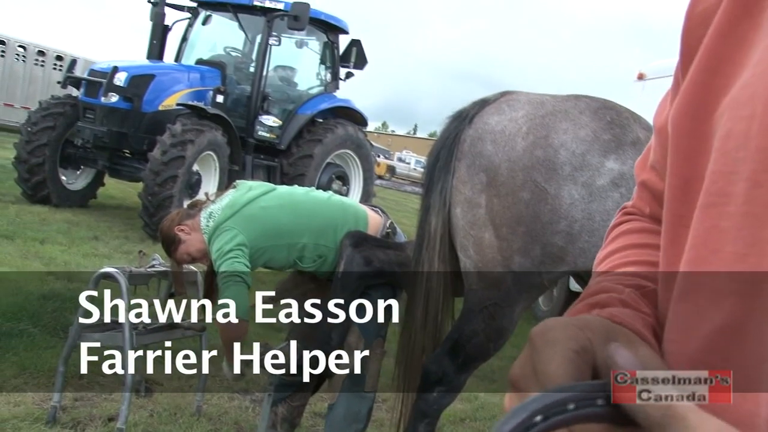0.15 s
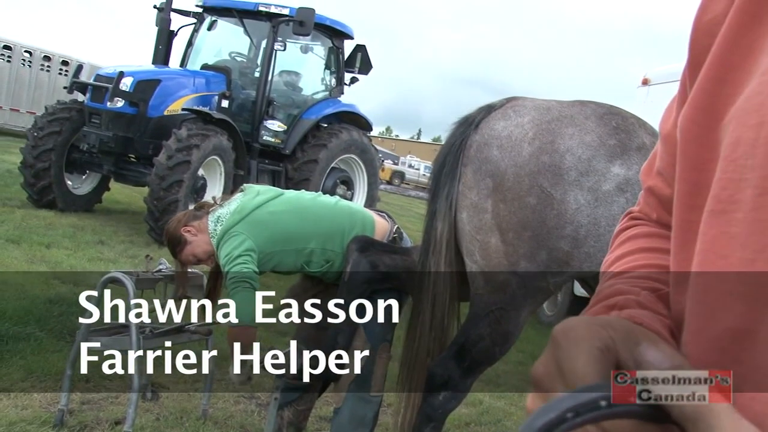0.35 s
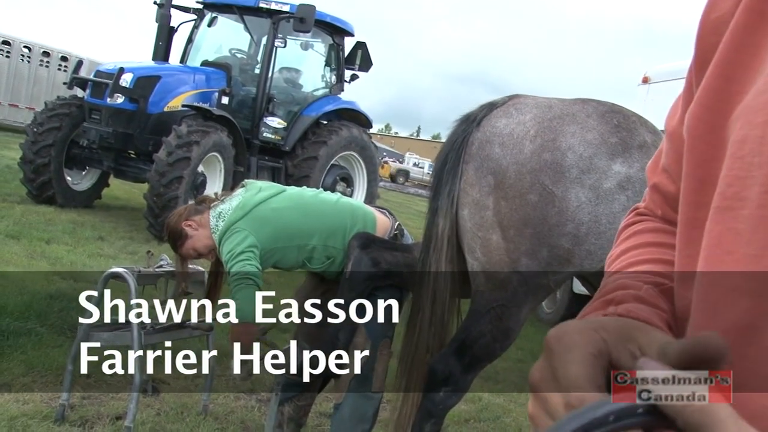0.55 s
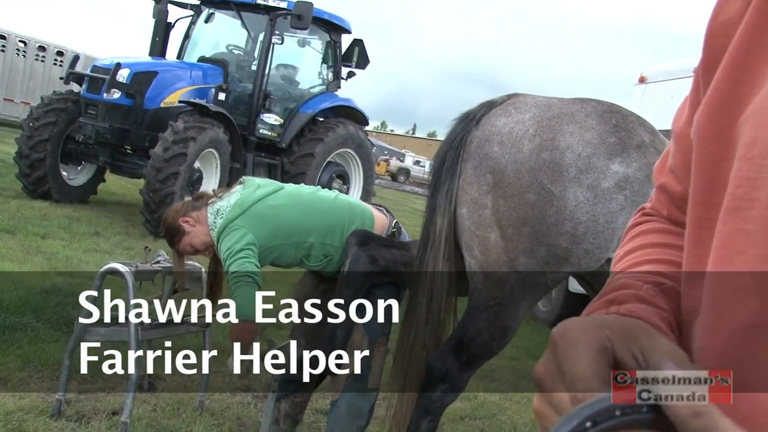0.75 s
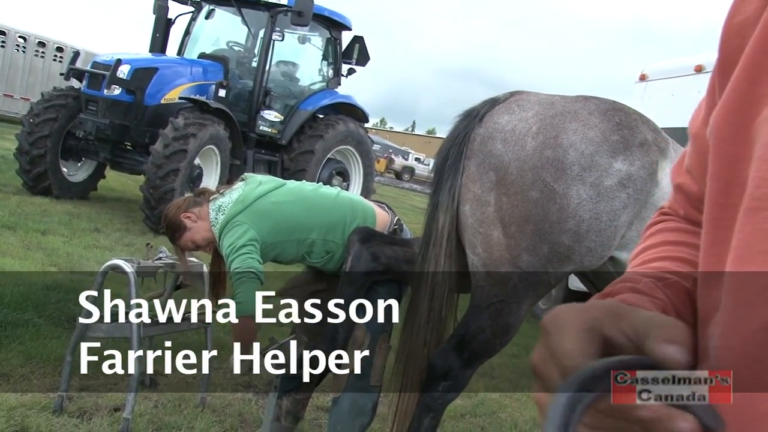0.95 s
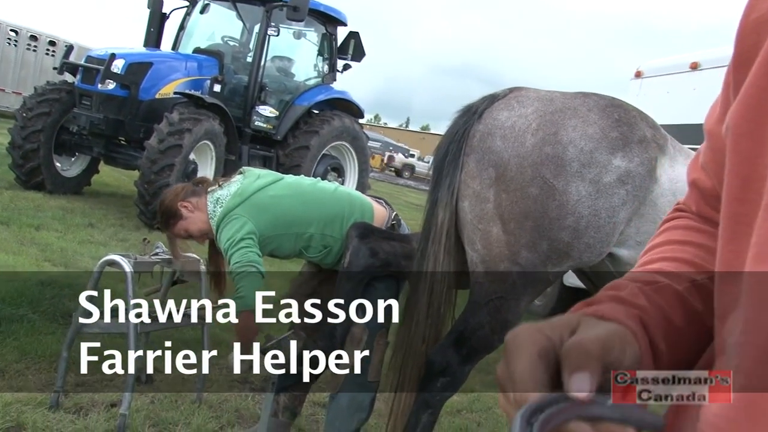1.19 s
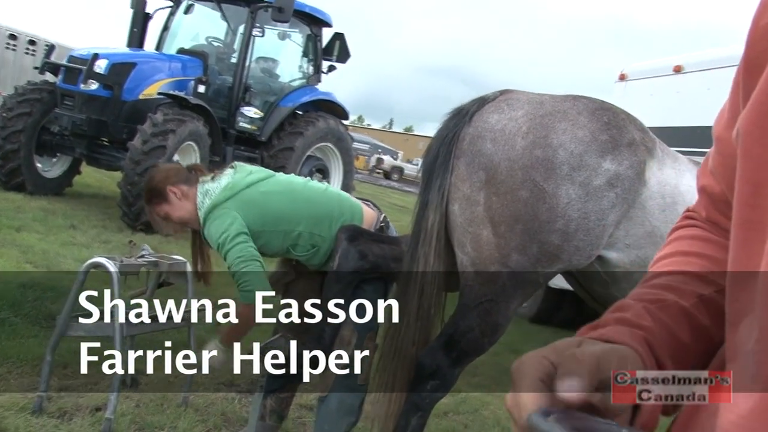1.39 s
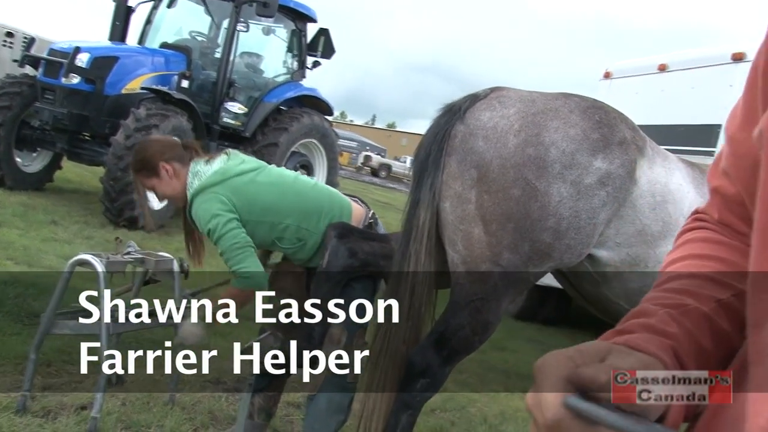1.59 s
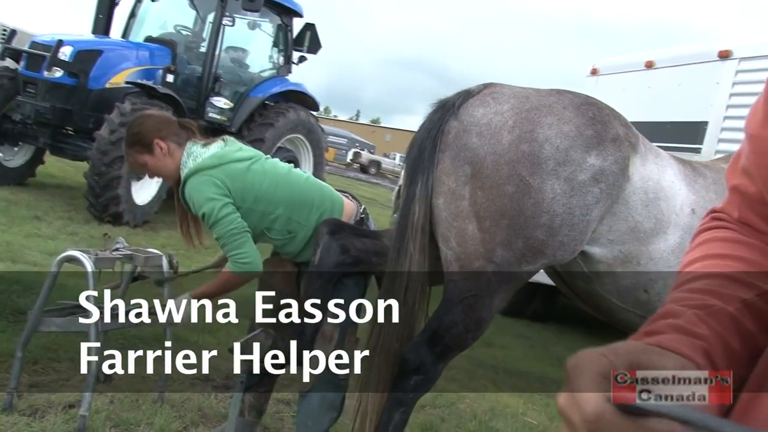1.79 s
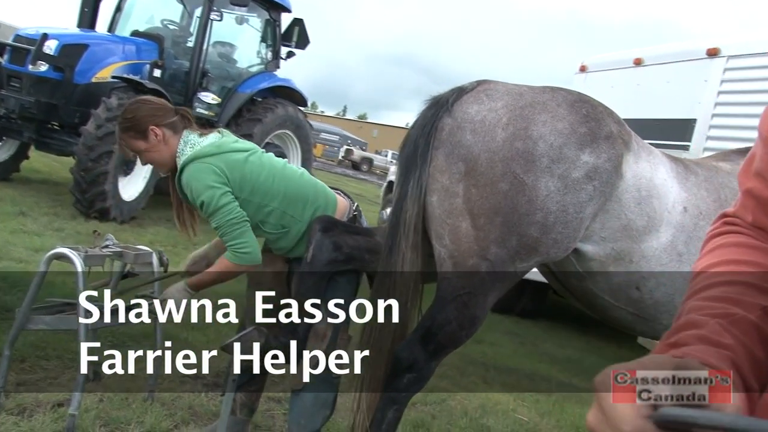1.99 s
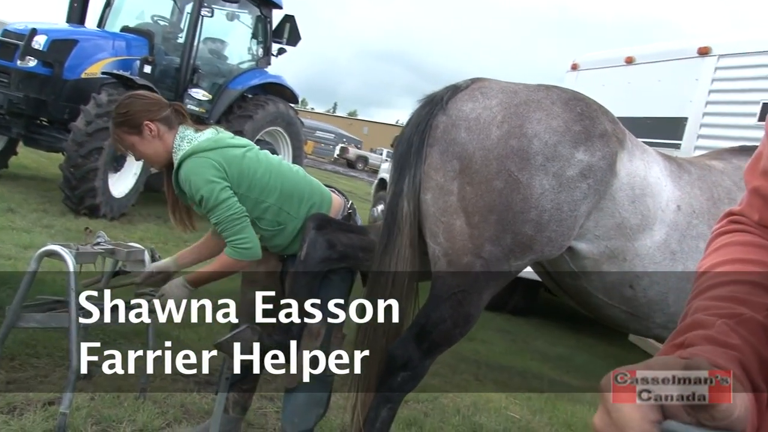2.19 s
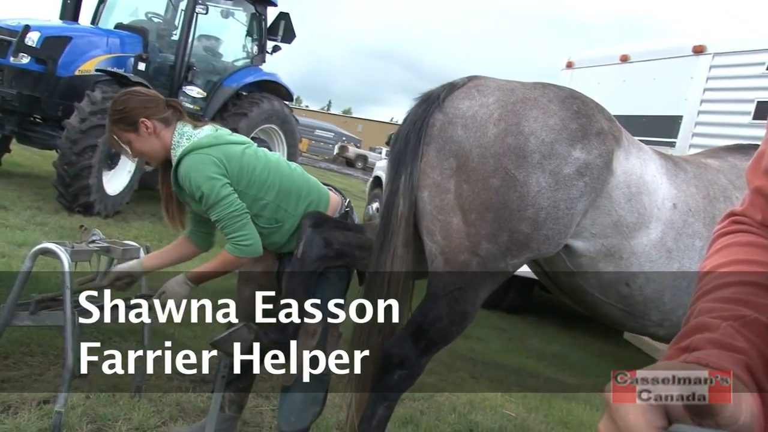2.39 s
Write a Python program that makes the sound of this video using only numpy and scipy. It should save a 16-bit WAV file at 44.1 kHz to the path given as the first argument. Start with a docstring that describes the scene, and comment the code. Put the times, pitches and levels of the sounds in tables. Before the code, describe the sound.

Steel horseshoe struck six times by a hammer outdoors, abruptly cutting to a tool's soft clatter

```python
"""Hammer on a horseshoe, then a dropped tool

Six hammer blows ring a steel horseshoe close by, outdoors: noise cracks and damped modes, echoed by a building.
Gain control ducks each blow too late to prevent clipping. A distant engine hums as two harmonics under faint whines
and a noise rumble. An abrupt cut leads to a quieter stretch, where a steel tool clinks as damped modes, then drops
and clatters to rest in knocks of noise and modes with a diffuse tail."""
import sys
import numpy as np
from scipy import signal
from scipy.fft import rfft, irfft
from scipy.io import wavfile
from scipy.ndimage import map_coordinates

SR = 44100
rng = np.random.default_rng(int(sys.argv[2]) if len(sys.argv) > 2 else 0)


def transcribe(u):
    """Save the signal u as a 16-bit wav file named by the first command-line argument.

    u: samples, shape (n,) or (channels, n), limited to [-1, 1]; the rate is SR.
    q: integer samples, one column per channel.
    """
    v = np.clip(np.atleast_2d(u).T, -1, 1)
    q = np.round(v * 32767).astype(np.int16)
    wavfile.write(sys.argv[1], SR, q)


N = 108045
CUT_S, CUT_FADE_S = 1.568, 0.0052


def amp(db):
    """Logarithmic level: decibels to linear gain."""
    return 10 ** (np.asarray(db) / 20)


def unit(x):
    """Power normalization: scales a signal to rms 1."""
    return x / np.sqrt(np.mean(x ** 2) + 1e-20)


def along(points, hz):
    """Logarithmic frequency scale: reads (Hz, value) points by interpolation in log frequency."""
    point_hz, values = np.transpose(points)
    return np.interp(np.log(hz + 1), np.log(point_hz + 1), values)


def curve(rows):
    """Linear interpolation in time: (s, value) points to one value per sample."""
    return np.interp(np.arange(N) / SR, *np.transpose(rows))


def wobble(rate):
    """Band-limited fluctuation: a smooth curve through random knots, rate of them per second."""
    knots = rng.standard_normal(int(N * rate / SR) + 4)
    return map_coordinates(knots, [np.arange(N) * rate / SR])


def pan(db):
    """Interaural level difference: gains whose left minus right is db."""
    return amp(np.array([[db], [-db]]) / 2)


def add(track, s, sound):
    """Superposition: mixes a sound into the track at time s."""
    start = round(s * SR)
    track[:, start:start + sound.shape[1]] += sound[:, :N - start]


def noise(spectrum, alike, size, tilt_db=0):
    """Spectral shaping: coloured stereo noise of rms 1; alike is the left-right correlation."""
    hz = np.fft.rfftfreq(size, 1 / SR)
    tilt = tilt_db * np.log2((hz + 1) / 1000)
    colour = amp(along(spectrum, hz) + tilt)
    mid, side = irfft(rfft(rng.standard_normal((2, size))) * colour, size)
    # The mid-side angle sets the correlation
    turn = np.arccos(np.clip(alike, -1, 1)) / 2
    return unit(np.cos(turn) * mid + np.sin(turn) * np.array([side, -side]))


def fall(t, t60):
    """Exponential damping: 60 dB lost in t60 seconds."""
    return np.exp(-np.log(1000) * t / t60)


def diffuse(sound, decays):
    """Reverberation: convolution with a fresh noise tail of energy 1 whose bands decay at their own rates."""
    hz, t, bands = signal.stft(rng.standard_normal((2, SR // 2)), SR, nperseg=128)
    band_t60 = along(decays, hz)[:, None]
    tail = signal.istft(bands * fall(t, band_t60), SR, nperseg=128)[1]
    return signal.fftconvolve(sound, tail / np.linalg.norm(tail[0]), axes=1)


def before_cut():
    """Gating: 1 until the abrupt cut, 0 after it, with a short linear fade."""
    return np.clip((CUT_S - np.arange(N) / SR) / CUT_FADE_S + .5, 0, 1)


# Firing rate of the engine: start_s [s], pitch_hz [Hz]
ENGINE_PITCH = [(0.0, 76.9), (0.27, 76.3), (0.45, 84.47), (0.74, 81.24), (1.28, 73.8), (1.55, 73.33),
                (1.66, 77.92), (2.2, 80.66), (2.45, 81.54)]
# Base level of the engine hum: start_s [s], level_db [dB]
HUM_LEVEL = [(0, -32.5), (.17, -32.5), (.3, -37), (.9, -36.5), (1.2, -31.5), (1.4, -26.5), (1.55, -35),
             (1.59, -41), (1.7, -52), (2.45, -53.5)]
SECOND_LOUD_DB, SECOND_QUIET_DB, HUM_WAVER_DB = -10, -2.5, 1.5  # second harmonic before and after the cut


def engine_hum():
    """Harmonic series: the firing rate and its second harmonic, each wavering in level."""
    phase = 2 * np.pi * np.cumsum(curve(ENGINE_PITCH)) / SR
    second_db = SECOND_QUIET_DB + (SECOND_LOUD_DB - SECOND_QUIET_DB) * before_cut()
    first = amp(HUM_WAVER_DB * wobble(14)) * np.sin(phase)
    second = amp(second_db + HUM_WAVER_DB * wobble(11)) * np.sin(2 * phase)
    return amp(curve(HUM_LEVEL)) * (first + second)


# Centre pitch of each faint tone: pitch_hz [Hz]
WHINE_PITCH = [284, 1510, 3020, 4530, 12080]
# Level of each tone: level_db before the cut [dB], level_db after it [dB]
WHINE_LEVELS = [(-43, -59.5), (-58.5, -76), (-68, -86.5), (-73.5, -87), (-73, -105)]
WHINE_DRIFT_HZ = 3


def faint_whines():
    """Frequency modulation: sinusoids that drift slightly in pitch and step down at the cut."""
    early = before_cut()
    out = np.zeros(N)
    for hz, (early_db, late_db) in zip(WHINE_PITCH, WHINE_LEVELS):
        level_db = late_db + (early_db - late_db) * early
        drifting_hz = hz + WHINE_DRIFT_HZ * wobble(6.6)
        out += amp(level_db) * np.sin(2 * np.pi * np.cumsum(drifting_hz) / SR)
    return out


# Relative spectrum of the outdoor rumble before the cut: pitch_hz [Hz], level_db [dB]
AIR_BEFORE = [(20, -16), (50, -13.5), (80, -0.5), (110, -11.5), (200, -16), (320, -18), (640, -31),
              (1500, -42), (3000, -48), (8000, -55.5), (15000, -63)]
# Relative spectrum of the outdoor rumble after the cut: pitch_hz [Hz], level_db [dB]
AIR_AFTER = [(20, -21), (50, -10.5), (75, -2), (120, -12.5), (190, -18), (350, -22.5), (600, -31.5),
             (1500, -40.5), (4000, -50), (9000, -56), (15000, -69)]
AIR_LOUD_DB, AIR_QUIET_DB = -33, -50
AIR_ALIKE = .5  # left-right correlation


def outdoor_rumble():
    """Broadband noise: two partly correlated stereo spectra that change over at the cut."""
    early = before_cut()
    loud = amp(AIR_LOUD_DB) * noise(AIR_BEFORE, AIR_ALIKE, size=N)
    quiet = amp(AIR_QUIET_DB) * noise(AIR_AFTER, AIR_ALIKE, size=N)
    return early * loud + (1 - early) * quiet


BACKGROUND_PAN_DB = -4.5  # left minus right


def background():
    """Superposition: hum, whines and rumble share one left-right level difference."""
    return pan(BACKGROUND_PAN_DB) * (engine_hum() + faint_whines() + outdoor_rumble())


# Relative spectrum of steel-contact noise: pitch_hz [Hz], level_db [dB]
CRACK_SPECTRUM = [(100, -9), (300, -9), (700, -21.5), (1080, -5.5), (1400, -10.5), (1920, 0.5),
                  (2400, -13.5), (2900, -9), (4100, -11.5), (5600, 8), (6800, -4.5), (9000, -5.5),
                  (12000, -11.5), (16000, -22.5)]
CRACK_T60_S, CRACK_ALIKE = 0.038, .4  # decay, left-right correlation


def crack_noise(t, tilt_db=0):
    """Impulsive excitation: a contact's coloured noise under exponential damping."""
    return noise(CRACK_SPECTRUM, CRACK_ALIKE, size=len(t), tilt_db=tilt_db) * fall(t, CRACK_T60_S)


MODE_SCATTER_DB = 1.5
PORT_SCATTER_RAD = .5  # random phase at each of the two microphone ports


def ring(modes, t):
    """Modal superposition: damped sinusoids in stereo, at fresh levels for each contact."""
    out = np.zeros((2, len(t)))
    for hz, db, t60 in modes:
        phase = 2 * np.pi * hz * t + PORT_SCATTER_RAD * rng.standard_normal((2, 1))
        level_db = db + MODE_SCATTER_DB * rng.standard_normal()
        out += amp(level_db) * np.sin(phase) * fall(t, t60)
    return out


# Upper modes of the struck steel: pitch_hz [Hz]
STEEL_PITCH = [6058, 6353, 9188, 10423, 12096]
# Ring of each mode: t60_s before the blow's ring factor [s], left minus right [dB], waver_db [dB]
STEEL_RING = [(.036, 0, 1), (.036, 2, 1), (.033, -6, 1), (.25, -5, 3), (.07, 0, 2)]
PORT_LAG_S = 2e-5  # the left port hears the steel first
WAVER_PER_S, WAVER_ONSET_S = 35, .14  # the ring wavers more as it fades
SWAY_RAD, SWAY_PER_S = .9, 25  # the steel moves, so its ring drifts in phase at each port


def steel_clang(t, modes_db, ring_factor):
    """Modal vibration: damped steel modes, drifting in phase and wavering in level as they fade."""
    out = np.zeros((2, len(t)))
    fading = np.minimum(t / WAVER_ONSET_S, 1)
    port_time = t + PORT_LAG_S * np.array([[1], [0]])
    for hz, (t60, pan_db, waver_db), db in zip(STEEL_PITCH, STEEL_RING, modes_db):
        phase = 2 * np.pi * hz * port_time + PORT_SCATTER_RAD * rng.standard_normal((2, 1))
        sway = np.array([wobble(SWAY_PER_S), wobble(SWAY_PER_S)])[:, :len(t)]
        phase += SWAY_RAD * fading * sway
        waver = waver_db * wobble(WAVER_PER_S)[:len(t)] * fading
        out += amp(db + waver) * pan(pan_db) * np.sin(phase) * fall(t, t60 * ring_factor)
    return out


# Hammer blows: start_s [s], crack level_db [dB], crack tilt [dB per octave], ring factor [ratio],
# then the level_db of each of the five steel modes [dB], which depend on where the hammer lands
HAMMER_BLOWS = [(0.2215, 9.6, 0.0016, 1.165, 28.6, 23.6, 22.7, -8.5, 1),
                (0.4610, 13.5, 0, 0.89, 13.5, 20, 19.1, 9.5, -1),
                (0.7128, 15.04, 0.0027, 1.02, 19.3, 24.9, 14.8, -9.5, -3),
                (0.9698, 15.04, 0.0065, 1.05, 19.8, 12.7, 20.9, 4, -4),
                (1.2210, 14.76, 0.0029, 0.97, 15.7, 10, 20.5, 5, -11.5),
                (1.4650, 14.3, 0.0041, 1.18, 11.2, 17.3, 23.2, -6.5, -15)]
# Lower modes of the steel under the hammer: pitch_hz [Hz], level_db over the crack [dB], t60_s [s]
STEEL_BODY = [(1093, -9, 0.021), (1912, -27, 0.089), (2004, -30, .1), (2887, -8.5, 0.017),
              (3281, -13.5, 0.021), (3493, -12, .025)]
# Decay of the yard's tail: pitch_hz [Hz], t60_s [s]
YARD_DECAY = [(200, .25), (2000, 0.23), (6000, .17), (12000, 0.088)]
# Echoes from the walls: delay_s [s], level_db [dB]
WALL_ECHOES = [(.102, -47), (0.165, -67.5)]
# Decay of each wall echo: pitch_hz [Hz], t60_s [s]
WALL_DECAY = [(200, .1), (2000, 0.21), (6000, 0.062), (12000, .08)]
YARD_DB = -28
RING_TO_YARD_DB = -5.5  # the ring carries less far than the crack
ECHO_TOP_HZ = 8100  # the walls return less treble


def hammer():
    """Impact and reflection: crack and steel modes, answered by diffuse yard sound and delayed wall echoes."""
    out, t = np.zeros((2, N)), np.arange(SR // 2) / SR
    dull = signal.butter(2, ECHO_TOP_HZ, fs=SR, output="sos")
    for s, crack_db, tilt_db, ring_factor, *modes_db in HAMMER_BLOWS:
        impact = amp(crack_db) * (crack_noise(t, tilt_db) + ring(STEEL_BODY, t))
        clang = steel_clang(t, modes_db, ring_factor)
        add(out, s, impact + clang)
        far = impact + amp(RING_TO_YARD_DB) * clang
        add(out, s, amp(YARD_DB) * diffuse(far, YARD_DECAY))
        for delay, db in WALL_ECHOES:
            add(out, s + delay, amp(db) * diffuse(signal.sosfilt(dull, far), WALL_DECAY))
    return out * before_cut()


# Modes of the clinking tool: pitch_hz [Hz], level_db [dB], t60_s [s]
TOOL_MODES = [(2750, -3, 0.071), (4050, -4.5, 0.073), (5330, 3, 0.041), (5650, -2, .05),
              (5860, -0.5, 0.082), (6500, -6, 0.12), (9700, -37.5, .04), (12900, -17, 0.065)]
CLINK_S, CLINK_DB, CLINK_PAN_DB = 1.9245, -30.5, -8
CLINK_TICK_DB = -3  # contact noise, before the clink level


def tool_clink(t):
    """Free vibration: the tool's damped modes after a brief tick of contact noise."""
    tick = amp(CLINK_TICK_DB) * crack_noise(t)
    return amp(CLINK_DB) * pan(CLINK_PAN_DB) * (ring(TOOL_MODES, t) + tick)


# Relative spectrum of the knock noise: pitch_hz [Hz], level_db [dB]
KNOCK_SPECTRUM = [(100, -10), (300, -44.5), (480, 3), (690, -2.5), (870, -8), (1350, 1), (1850, -3.5),
                  (2600, -7.5), (4500, -15), (7200, -17), (10000, -30.5), (15500, -44.5)]
# Modes of what the tool lands on: pitch_hz [Hz], level_db over the knock [dB], t60_s [s]
LANDING_MODES = [(484, -12, 0.059), (684.5, -11, 0.089), (1246, -31, 0.21), (1343, -4, 0.025),
                 (1410, 0, 0.023), (1810, -13.5, 0.068), (2690, -27, 0.16)]
KNOCK_T60_S, KNOCK_ALIKE, KNOCK_ATTACK_S = 0.039, 0.63, 0.00044  # decay, correlation, rise time constant


def landing_knock(t, db, pan_db, tilt_db):
    """Impact excitation: a noise thud sounds with the landing's modes under a short exponential rise."""
    thud = noise(KNOCK_SPECTRUM, KNOCK_ALIKE, size=len(t), tilt_db=tilt_db) * fall(t, KNOCK_T60_S)
    rise = 1 - np.exp(-t / KNOCK_ATTACK_S)
    return amp(db) * pan(pan_db) * (thud + ring(LANDING_MODES, t)) * rise


# Knocks of the tool: start_s [s], level_db [dB], left minus right [dB], treble tilt [dB per octave]
TOOL_KNOCKS = [(1.9263, -33, -3, -6), (1.9674, -10.5, -2, 0.5), (1.9919, -31, 6, -1),
               (2.0467, -22, -2, 1.5), (2.0655, -23, -8.5, 1), (2.0786, -27, 0, 0), (2.107, -34.5, -8, 1),
               (2.152, -35, -1, -2.5), (2.202, -50.5, -6.5, -3), (2.335, -54, -1.5, -2.5)]
# Decay of the tail after each knock: pitch_hz [Hz], t60_s [s]
KNOCK_DECAY = [(400, 0.52), (1300, 0.41), (4000, 0.24), (12000, 0.23)]
KNOCK_TAIL_DB = -14  # relative to the knock


def dropped_tool():
    """Successive impacts: a light ringing clink, then dull knocks, each with a diffuse tail."""
    out, t = np.zeros((2, N)), np.arange(SR // 3) / SR
    add(out, CLINK_S, tool_clink(t))
    for s, db, pan_db, tilt_db in TOOL_KNOCKS:
        knock = landing_knock(t, db, pan_db, tilt_db)
        add(out, s, knock)
        add(out, s, amp(KNOCK_TAIL_DB) * diffuse(knock, KNOCK_DECAY))
    return out


def scene():
    """Linear superposition: all sources add at the microphone."""
    return background() + hammer() + dropped_tool()


DUCK_FROM_DB, DUCK_SHARE = -3, 0.41  # threshold, share of the excess dB that is taken away
DUCK_ATTACK_S, RECOVER_DB_PER_S = .003, 57
CLIP_LEVEL, TOP_HZ = 0.91, 15800


def record(dry):
    """Dynamic compression: lagging gain control ducks too late, so blows clip; a low-pass limits the band."""
    peak_db = 20 * np.log10(np.abs(dry).max(axis=0) + 1e-9)
    over_db = DUCK_SHARE * np.maximum(peak_db - DUCK_FROM_DB, 0)
    # The running maximum on a slope holds each peak, then recovers linearly in dB
    recovery = RECOVER_DB_PER_S * np.arange(N) / SR
    held_db = np.maximum.accumulate(over_db + recovery) - recovery
    keep = np.exp(-1 / (DUCK_ATTACK_S * SR))
    duck_db = signal.lfilter([1 - keep], [1, -keep], held_db)
    clipped = np.clip(dry * amp(-duck_db), -CLIP_LEVEL, CLIP_LEVEL)
    band_limit = signal.ellip(10, .1, 80, TOP_HZ, fs=SR, output="sos")
    return signal.sosfilt(band_limit, clipped)


dry = scene()
out = record(dry)
transcribe(out)
```